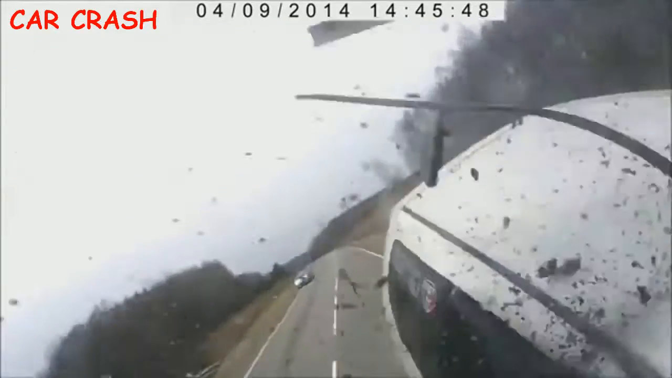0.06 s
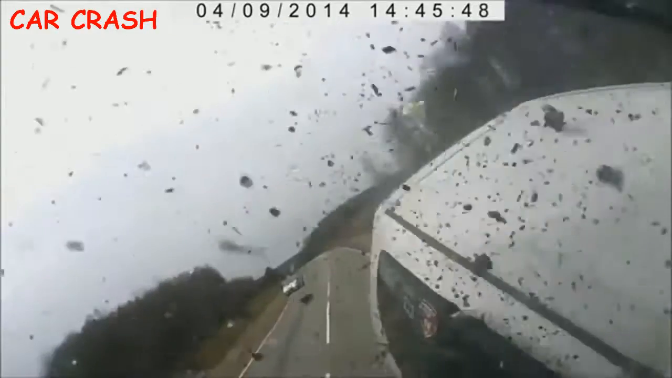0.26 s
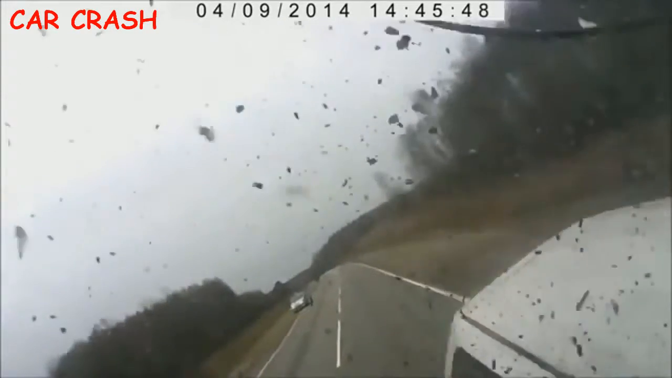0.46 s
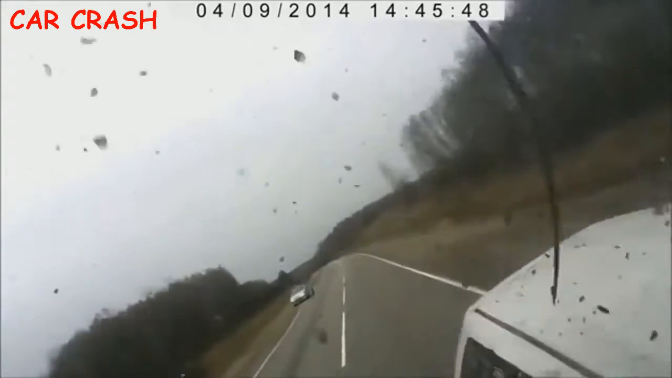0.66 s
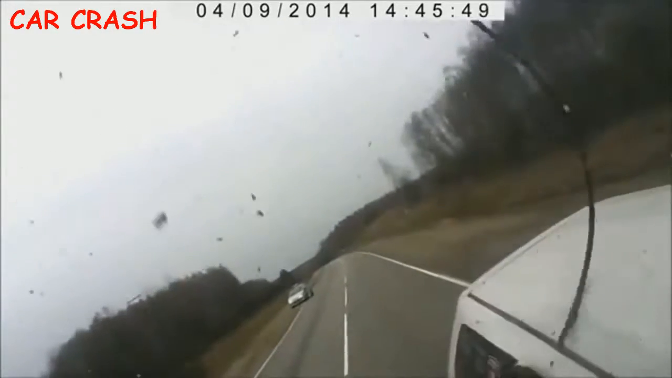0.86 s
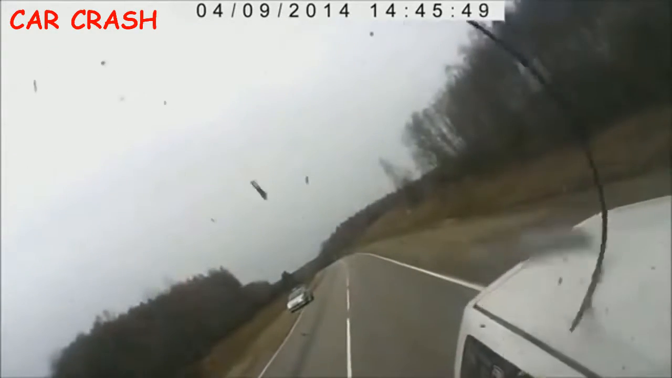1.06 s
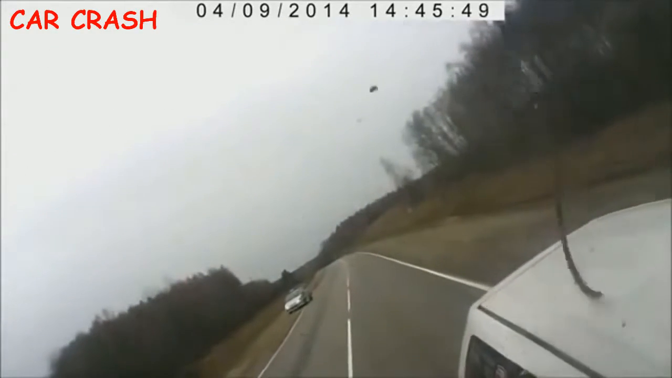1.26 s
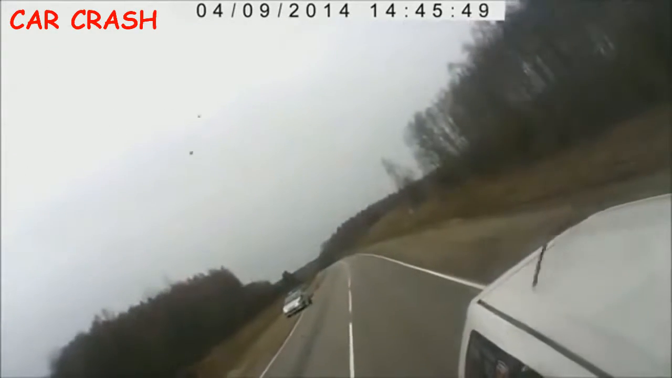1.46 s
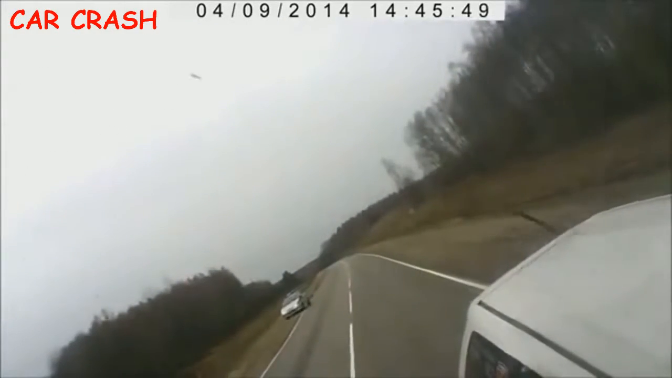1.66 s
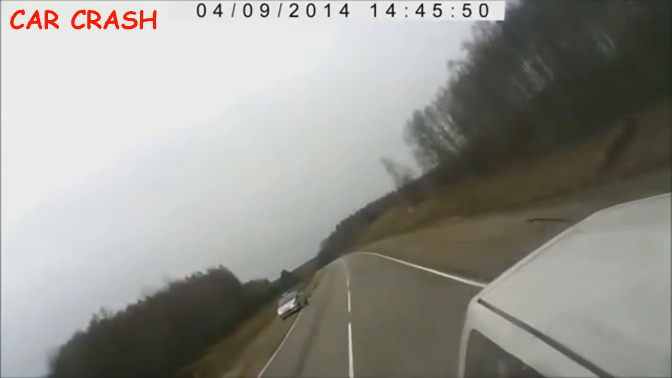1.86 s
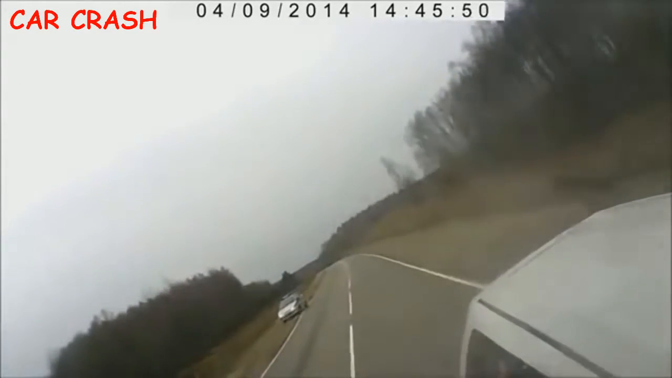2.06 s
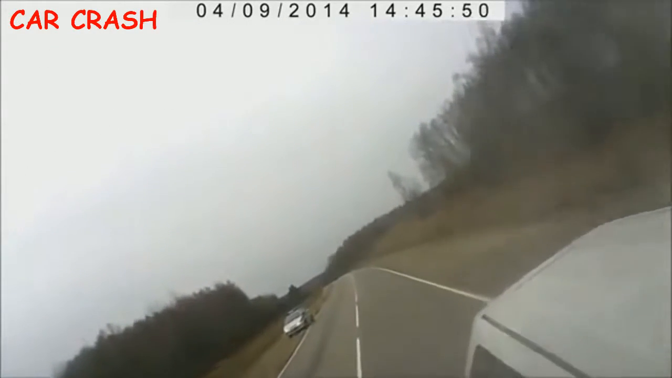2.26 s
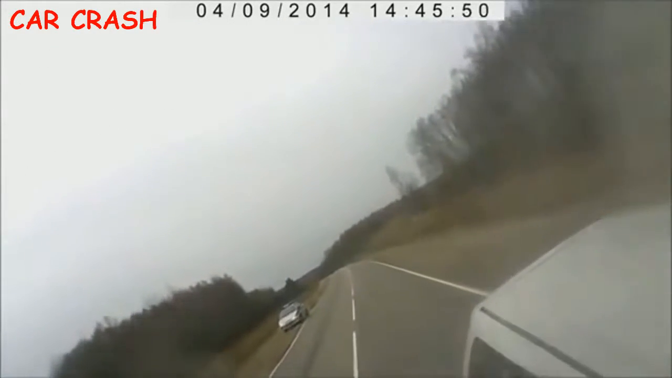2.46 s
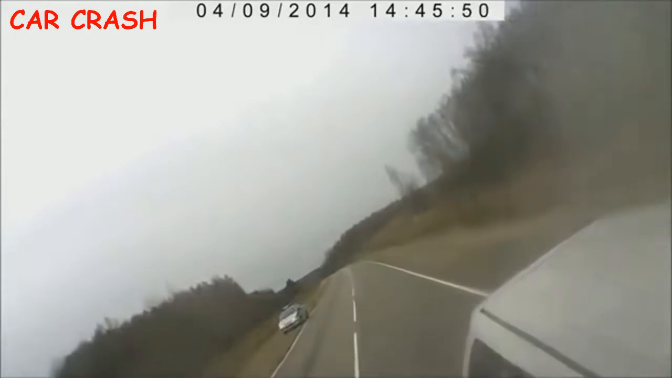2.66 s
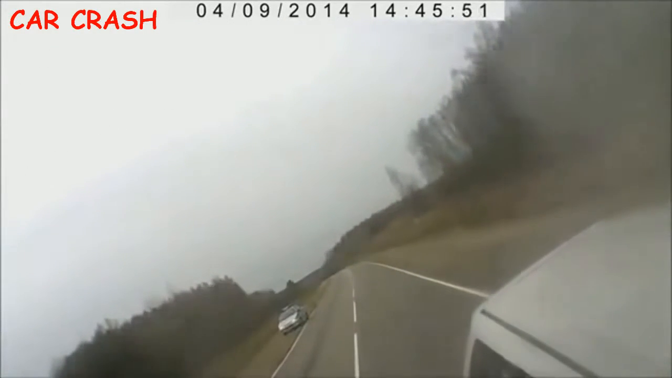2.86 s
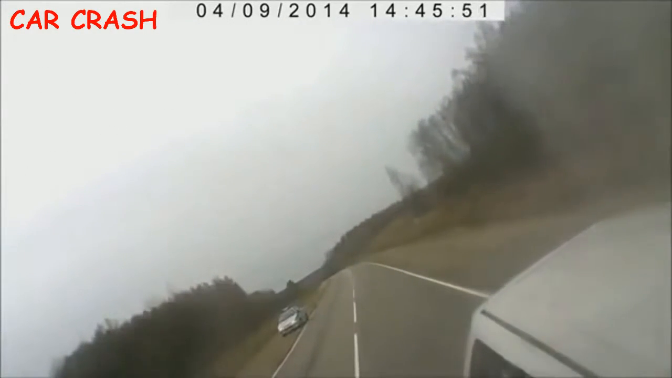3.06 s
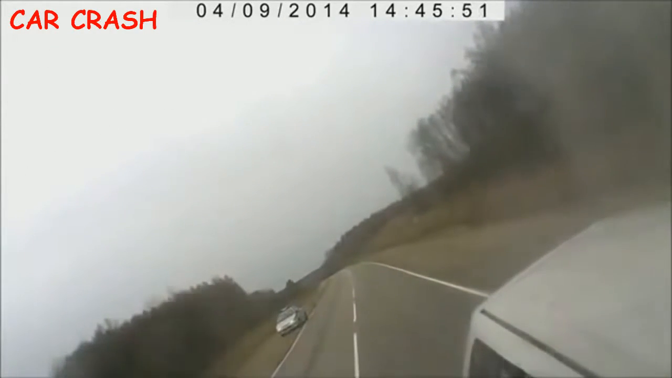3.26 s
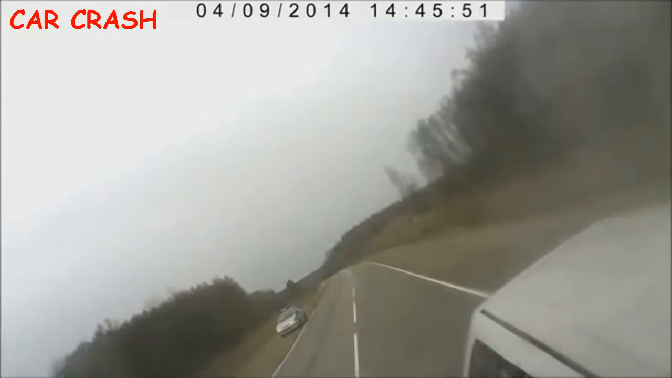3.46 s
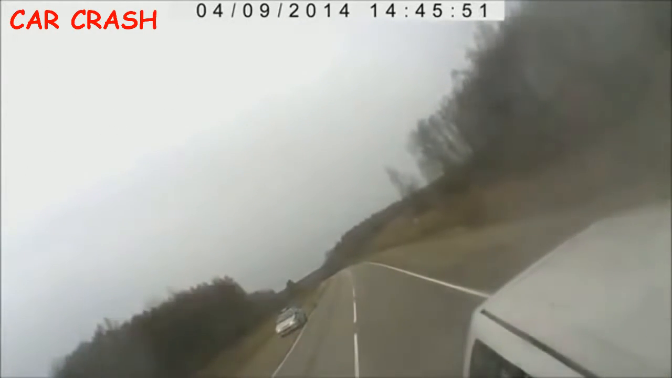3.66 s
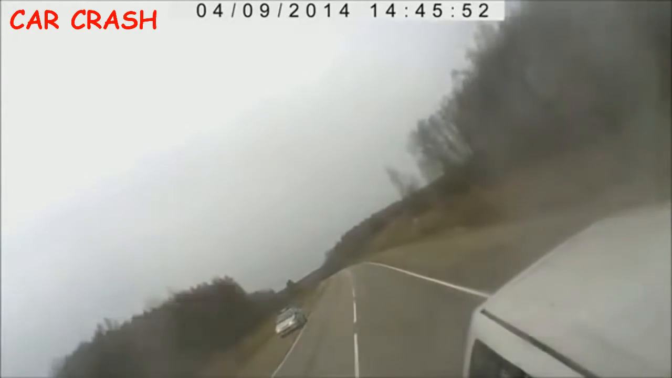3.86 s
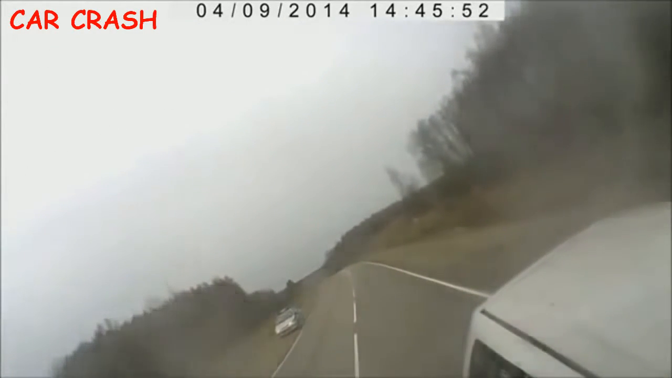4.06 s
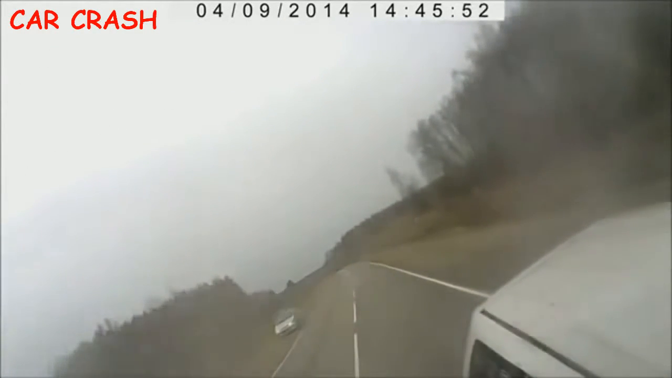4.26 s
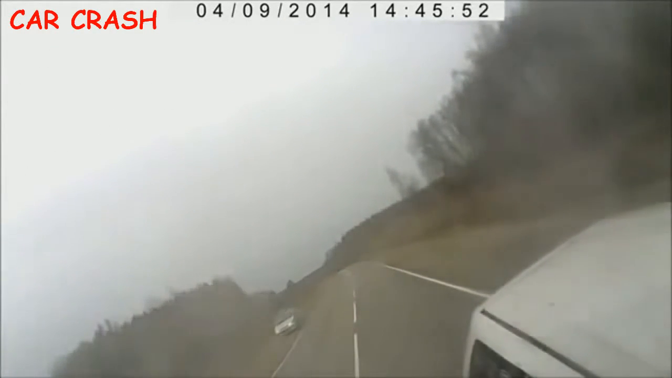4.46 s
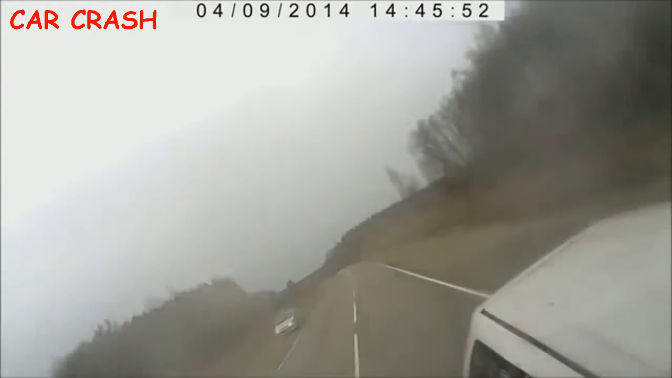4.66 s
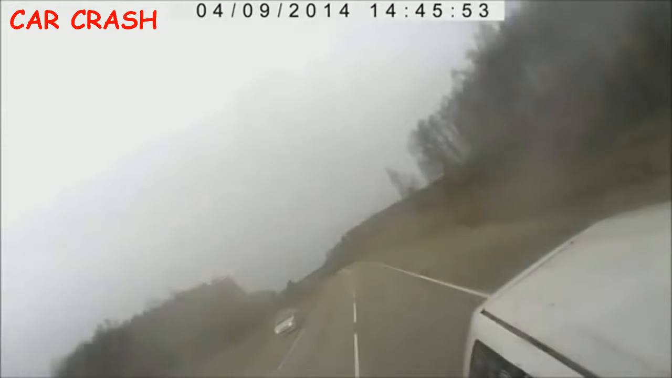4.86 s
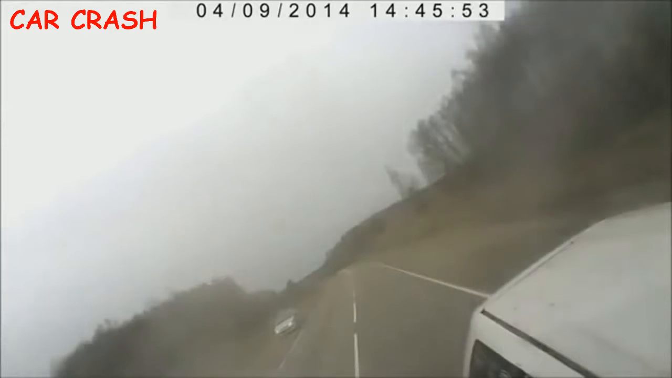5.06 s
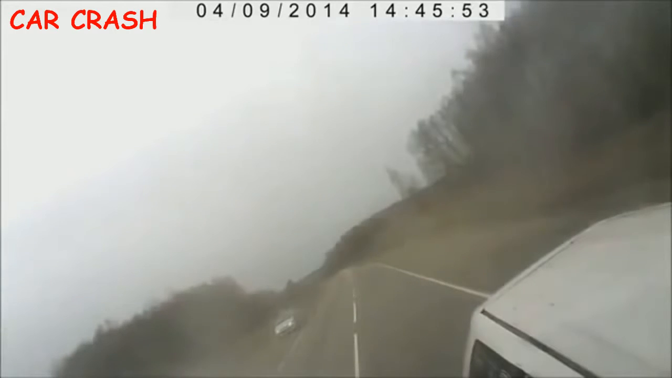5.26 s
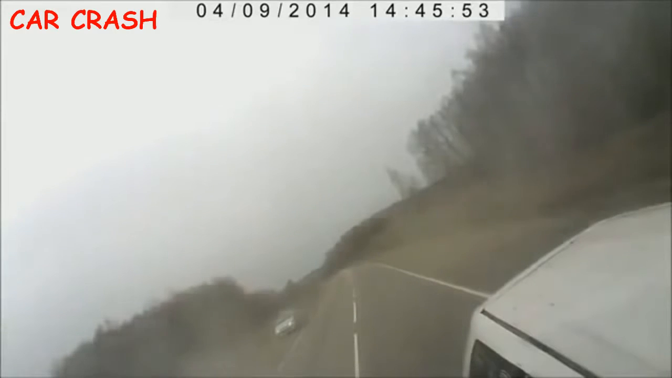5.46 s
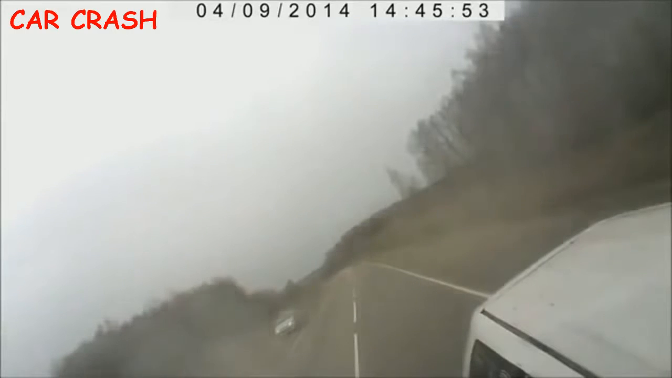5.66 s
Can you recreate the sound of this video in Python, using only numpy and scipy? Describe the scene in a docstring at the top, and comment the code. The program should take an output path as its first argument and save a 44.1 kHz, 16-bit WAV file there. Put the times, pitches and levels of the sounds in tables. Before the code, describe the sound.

A loud car crash starts immediately, heard close and dry from inside the cabin. Sheet metal buckles in rapid crunching snaps, with a falling groan and deep body thumps. It peaks around 0.3 to 0.8 seconds, when glass sprays and pings and the overloaded microphone turns the sound choppy and distorted. From about 1 second the crash dies down into scraping, chattering parts. Between 1.2 and 2.2 seconds, debris lands on the car in irregular dull knocks over a low sliding rumble, faint metal moans and the engine's throb. At about 2.3 seconds a second, quieter wave of wreckage clatters by with tinkling glass, settling just after 3 seconds. A few last knocks come near 3.4 seconds. The engine then idles low and steady until the end, just short of 6 seconds, with faint glass ticks around 4.5 and 5.2 seconds.

```python
"""Road collision from inside a car

Sheet metal buckles and groans, the body shudders and glass sprays. Debris knocks on the car, a second
wave of wreckage clatters by, and the engine is left idling. Blows excite the modes of panels and trim
in a small, damped cabin, and the pressure overloads the microphone of a dashboard camera."""
import sys
import numpy as np
from scipy import signal
from scipy.fft import rfft, irfft
from scipy.io import wavfile
from scipy.ndimage import uniform_filter1d

SR = 44100
rng = np.random.default_rng(int(sys.argv[2]) if len(sys.argv) > 2 else 0)


def file_out(sig):
    """Save sig as 16-bit WAV at sys.argv[1]."""
    # one column per channel
    cols = np.atleast_2d(sig).T
    # limit, then scale
    lim = np.clip(cols, -1, 1)
    pcm = np.round(lim * 32767).astype(np.int16)
    wavfile.write(sys.argv[1], SR, pcm)


N = 252428
TIME = np.arange(N) / SR

# spectrum radiated by glass and hard plastic: frequency_hz, level_db
GLASS_SPECTRUM = [(800, -16), (2000, 8), (3000, 4.5), (4100, 5.5), (5200, -1), (7200, -6.5), (8800, -7.5),
                  (11000, -7), (16000, -15)]


def undb(db):
    """Amplitude ratio of a level in decibels."""
    return 10 ** (np.asarray(db) / 20)


def unit(x):
    """Normalisation to rms 1."""
    return x / np.sqrt(np.mean(x ** 2) + 1e-18)


def past(start_s):
    """Seconds elapsed since an onset, zero before it."""
    return np.maximum(TIME - start_s, 0)


def add(out, start_s, x):
    """Superposition of x on out from start_s."""
    i = max(int(start_s * SR), 0)
    out[i:i + len(x)] += x[:N - i]


def wander(rate_hz):
    """Smooth random modulation with a spread near 1."""
    knots = rng.standard_normal(4096)
    joined = np.interp(TIME * rate_hz, np.arange(len(knots)), knots)
    return uniform_filter1d(joined, int(SR / rate_hz / 2) + 1)


def clicks(per_s, spread_db):
    """Shot noise: randomly timed impulses of uneven size, rms 1."""
    size = undb(spread_db * np.minimum(rng.exponential(size=N), 4))
    return unit((rng.random(N) < per_s / SR) * size * rng.choice([-1, 1], N))


def colour(x, spectrum, size=4096):
    """Minimum-phase filter through (frequency_hz, level_db) points; white noise keeps its power."""
    hz, db = np.transpose(spectrum)
    bins_hz = np.maximum(np.fft.rfftfreq(size, 1 / SR), 1)
    gain = undb(np.interp(np.log(bins_hz), np.log(hz), db))
    cepstrum = irfft(np.log(gain))
    cepstrum[1:size // 2] *= 2
    cepstrum[size // 2 + 1:] = 0
    response = irfft(np.exp(rfft(cepstrum)))
    return signal.fftconvolve(x, response / np.linalg.norm(response))[:len(x)]


def fade(t60_s):
    """Exponential decay down to -60 dB."""
    t = TIME[:int(max(t60_s, .002) * SR)]
    return undb(-60 * t / t[-1])


def burst(length_s):
    """Envelope of one contact: a fast rise, a short hold and a quick fall."""
    u = TIME[:SR // 4] / max(length_s, .004)
    return np.minimum(u / .08, 1) * np.exp(-(1.9 * u) ** 1.4)


def gate(noise, start_s, envelope):
    """Amplitude modulation: the stretch of noise from start_s, shaped by an envelope."""
    return envelope * noise[int(start_s * SR):][:len(envelope)]


def ring(hz, t60_s):
    """Free decay of one struck mode; the contact lasts about a cycle."""
    decay = fade(t60_s)
    cycles = hz * TIME[:len(decay)]
    return decay * np.sin(2 * np.pi * cycles) * (1 - np.exp(-2 * cycles))


def resonate(force, modes):
    """Forced response of (pitch_hz, bandwidth_hz, level_db) modes."""
    return sum(undb(db) * signal.lfilter(*signal.iirpeak(hz, hz / width_hz, fs=SR), force)
               for hz, width_hz, db in modes)


def buckling():
    """Sheet metal buckles in bursts of snaps. Returns the folds' ring and forces on metal and glass."""
    # heaviest buckles: start_s, level_db, splinter_db, pitch_hz
    heavy_buckles = [(.002, -3, -15, 810), (.015, -10, -16, 610), (.026, -1, -11.5, 525),
                     (.044, -4, -8, 710), (0.064, 5, -9.5, 470), (0.082, -2, -16, 900),
                     (0.097, -7, -16, 806), (.11, -2.5, -14, 576), (.142, -6, -18.5, 940),
                     (.186, -1, -17.5, 700), (.212, 0.5, -14.5, 708), (.234, -1.5, -12.5, 520),
                     (.254, -4, -12.5, 740), (.27, -1, -12, 635), (.277, 0, -17.5, 890),
                     (0.287, 0.5, -19, 850), (.31, -20, -20.5, 610), (0.319, 0, -13.5, 1170),
                     (.332, -3.5, -11.5, 1000), (.342, -1, -13.5, 800), (0.355, -0.5, -12, 1060),
                     (0.37, 0, -13, 788), (.381, -1.5, -8, 899), (.399, -2, -10, 789),
                     (.412, -2.5, -14.5, 780), (.429, -11, -9, 900), (0.435, 6.5, 0, 1230),
                     (.452, -4.5, -9.5, 816), (0.469, -3.5, -16.5, 1114), (.484, -4.5, -13, 895),
                     (0.496, 1, -12.5, 520), (.518, 3.5, -5, 718), (.537, -2.5, -17, 1010),
                     (.585, -4.5, -14.5, 490), (0.601, -5.5, -11.5, 490), (0.635, -12, -12.5, 1100),
                     (0.664, -7, -12, 850), (.692, -4, -6.5, 490), (.709, -7.5, -11.5, 657),
                     (.722, -5, -5.5, 1400), (0.75, -7.5, -12, 738), (0.759, -9, -2.5, 700),
                     (.786, -10, -22, 1010), (.815, -44, -55, 600), (0.838, -10, -31, 457),
                     (0.867, -8, -16, 519), (0.941, -6.5, -24, 876), (0.967, -15, -19.5, 1060),
                     (1.019, -27, -33, 700), (1.049, -16, -33, 571), (1.122, -20, -27, 433)]
    # spells of lesser buckles: start_s, end_s, level_db, splinter_db
    spells = [(0.203, 0.277, -10.5, -15), (0.345, 0.552, -14.5, -15), (0.59, .88, -9, -19)]
    buckles_per_s, spread_db = 60, 3
    folds, metal, glass = np.zeros((3, N))
    buckles = []
    for s, db, splinter_db, hz in heavy_buckles:
        add(folds, s, undb(db - 5) * ring(hz, t60_s=11 / hz))
        buckles.append((s, db, splinter_db))
    for start_s, end_s, db, splinter_db in spells:
        for k, (delay, softer, duller) in enumerate(rng.standard_normal((40, 3))):
            s = start_s + (k + .6 * abs(delay)) / buckles_per_s
            if s < end_s:
                buckles.append((s, db - spread_db * softer, splinter_db - spread_db * duller))
    snaps = clicks(per_s=7000, spread_db=5.5)
    crush, tear = burst(length_s=.0092), burst(length_s=.0058)
    for (s, db, splinter_db), pitches in zip(buckles, rng.random((200, 4))):
        add(metal, s, undb(db) * crush)
        add(glass, s, undb(splinter_db) * splinter(gate(snaps, s, tear), pitches))
        add(folds, s, undb(splinter_db) * crack(pitches[0]))
    return folds, snaps * metal, glass


def splinter(force, pitches, low_hz=2000, high_hz=10000, q=18):
    """Resonance of a brittle piece at its own few pitches, each 0-1 across the range."""
    modes = [(hz, hz / q, 4) for hz in low_hz * (high_hz / low_hz) ** pitches]
    return (force + resonate(force, modes)) / np.sqrt(3)


def crack(pitch, low_hz=2200, high_hz=5000):
    """Brittle fracture excites one heavily damped mode; pitch is 0-1 across the range."""
    return undb(4) * ring(low_hz * (high_hz / low_hz) ** pitch, t60_s=.009)


def panels(force):
    """Plate vibration: a broad, dull clank with the panel modes standing out of it."""
    # body panel modes: pitch_hz, bandwidth_hz, level_db
    panel_modes = [(266, 75, -1.5), (456.6, 20, -7), (557, 8, 1), (662, 16, 1.5), (780, 32, -8.5),
                   (1032, 63, 0.5), (1200, 88, -4), (1363, 5.8, -3.5)]
    # spectrum radiated by sheet metal: frequency_hz, level_db
    metal_spectrum = [(60, -25), (160, -6), (300, 1.5), (500, 3), (750, 3.5), (1100, 1.5), (1600, -4),
                      (2400, -17), (4000, -24.5), (8000, -43.5), (16000, -32.5)]
    return colour(force + undb(-3) * resonate(force, panel_modes), metal_spectrum)


def glass_and_trim(force):
    """Stiff glass and hard plastic answer a blow with a bright tick and high resonances."""
    # windscreen and trim modes: pitch_hz, bandwidth_hz, level_db
    trim_modes = [(2060, 39, 5.5), (2570, 6.8, -2), (2750, 83, -6.5), (3700, 150, 3), (3865, 35, 7.5),
                  (3970, 11, -5), (4670, 35, -21.5), (8850, 180, 10)]
    return colour(force + undb(-8) * resonate(force, trim_modes), GLASS_SPECTRUM)


def shudder():
    """Structure-borne jolts, hard in the collision and gentler in the slide, with damped thumps."""
    # spectrum of the body's vibration: frequency_hz, level_db
    body_spectrum = [(12, -13.5), (28, 3), (45, -3), (72, -8), (100, -5), (140, -5.5), (220, -9.5),
                     (350, -8.5), (800, -30), (3000, -74.5)]
    # blows that heave the body and press on the cabin air: start_s, level_db, push_s
    thumps = [(0.028, -9, 0.0073), (0.096, -1, 0.019), (0.17, -11, 0.0082), (0.291, 2, 0.015),
              (0.337, 9, 0.0043), (0.376, -0.5, 0.007), (0.439, 4.5, .008), (0.461, 2, 0.0063),
              (0.557, 0, 0.011), (0.723, 2.5, 0.0051), (0.806, -4, 0.0058), (0.83, 1.5, 0.0034)]
    fall_db_per_s, damping = 23, 1.38
    collision = undb(-10.5 - fall_db_per_s * past(.46))
    jolts = unit(colour(clicks(per_s=900, spread_db=-.1), body_spectrum))
    out = jolts * np.hypot(collision, slide())
    for s, db, push_s in thumps:
        u = TIME[:SR // 4] / push_s
        add(out, s, undb(db) * np.sin(np.pi * u) * np.exp(-damping * u))
    return out


def slide(fall_db_per_s=15):
    """Strength of sliding friction on the road: steady, then fading as the car comes to rest."""
    return undb(-32 - fall_db_per_s * past(2.36))


def groans(jitter=.11):
    """Stick-slip in bending metal: a rough harmonic moan that glides as the load changes."""
    # bodywork under load: start_s, end_s, from_hz, to_hz, level_db, step_db (per harmonic)
    bends = [(0.036, 0.26, 189.5, 52.14, -9, -9.5), (0.348, 0.413, 750, 783, -6, -29),
             (0.401, 0.464, 785, 726, -10, -27), (0.722, 0.75, 640, 696, -6, -16),
             (1.183, 1.527, 560, 254.2, -29.5, -7), (1.97, 2.184, 53.7, 73.5, -25, -4.5)]
    out, rough = np.zeros(N), wander(rate_hz=82)
    flutter = [undb(4 * wander(rate_hz=70)) for _ in range(4)]
    for start_s, end_s, from_hz, to_hz, db, step_db in bends:
        u = np.linspace(0, 1, int((end_s - start_s) * SR))
        span = int(start_s * SR) + np.arange(len(u))
        hz = from_hz * (to_hz / from_hz) ** u
        phase = 2 * np.pi * np.cumsum(hz * (1 + jitter * rough[span])) / SR
        moan = sum(undb(k * step_db) * gain[span] * np.sin((k + 1) * phase)
                   for k, gain in enumerate(flutter))
        add(out, start_s, undb(db) * moan * np.sin(np.pi * u))
    return out


def wreckage():
    """Many small impacts add in power. Returns shudder plus chimes, and forces on metal and glass."""
    # waves of debris: full_s, hold_s, rattle_db, grit_db, rise_db_per_s, fall_db_per_s
    waves = [(0.452, 0.27, -14.5, -26.5, 53, 27.5), (2.322, 0.033, -29.5, -42, 46, 30)]
    rest_s, grit_slope = 3.05, 1.075  # grit comes and goes a little faster than the rattle
    heavy, fine = slide() * undb(-11), np.zeros(N)  # the slide also scrapes the panels
    for full_s, hold_s, rattle_db, grit_db, rise, fall in waves:
        swell_db = -rise * np.maximum(full_s - TIME, 0) - fall * past(full_s + hold_s)
        heavy = np.hypot(heavy, undb(rattle_db + swell_db))
        fine = np.hypot(fine, undb(grit_db + grit_slope * swell_db))
    settle = undb(-152 * past(rest_s))  # heavy debris comes to rest
    trickle = undb(7 * past(rest_s))  # slows the decay of the grit
    clumps = undb(3.2 * wander(rate_hz=76))
    chimes = shards() * fine * undb(-6.5)
    rattle = clicks(per_s=1000, spread_db=1) * heavy * clumps
    grit = clicks(per_s=1500, spread_db=-.5) * fine * clumps
    return settle * (shudder() + chimes), settle * rattle, trickle * grit


def shards(low_hz=1874, high_hz=10150, spread_db=19, count=800):
    """Glass fragments chime at random times, each at its own natural frequency."""
    out = np.zeros(N)
    for when, pitch, life, size in rng.random((count, 4)):
        hz = low_hz * (high_hz / low_hz) ** pitch
        add(out, when * N / SR, undb(spread_db * size) * ring(hz, t60_s=.19 * (.21 + life)))
    return unit(colour(out, GLASS_SPECTRUM))


def tumbles():
    """Chattering contact drives a part's two modes. Returns their ring and forces on metal and glass."""
    # skidding parts: start_s, level_db, pitch_hz, splinter_db, length_s
    skids = [(0.481, -8.5, 912, -13, 0.096), (0.672, -11, 1056, -14.5, 0.12), (0.994, -25, 620, -28, 0.14),
             (1.04, -24.5, 567, -42, 0.23), (1.124, -22.5, 596, -52, 0.12), (1.224, -26, 443, -37, 0.13),
             (1.3, -24.5, 264, -33.5, 0.039), (2.378, -19, 656, -28.5, 0.052),
             (2.433, -21, 656, -32, 0.041), (2.47, -20, 490, -60, 0.11), (2.505, -26, 680, -35, 0.071),
             (2.54, -22.5, 663, -63, 0.22), (2.583, -15.5, 1060, -39, 0.036),
             (2.724, -23.5, 1090, -57, 0.053), (2.779, -19, 1120, -41, 0.051),
             (2.822, -18.5, 1590, -58, 0.059), (2.833, -24, 606, -38, 0.092),
             (2.91, -23.5, 990, -39, 0.062), (2.937, -36, 1280, -38, 0.055),
             (2.972, -29.5, 644, -61, 0.086), (3.006, -36.5, 462, -44, 0.084), (3.32, -28, 443, -47, 0.054),
             (3.341, -30, 1340, -52, 0.023), (3.442, -38, 468, -52, 0.041)]
    parts, metal, glass = np.zeros((3, N))
    snaps, grit = clicks(per_s=900, spread_db=-1), clicks(per_s=2200, spread_db=.5)
    overtone_ratios = rng.uniform(2.2, 2.23, len(skids))
    for (s, db, hz, splinter_db, length_s), ratio in zip(skids, overtone_ratios):
        contact = burst(length_s)
        chatter = gate(snaps, s, contact)
        for mode_hz, mode_db in [(hz, 0), (hz * ratio, -11)]:
            mode = signal.lfilter(*signal.iirpeak(mode_hz, Q=9, fs=SR), chatter)
            add(parts, s, undb(db + mode_db) * mode / np.abs(mode).max())
        add(metal, s, undb(db - 8) * chatter)
        add(glass, s, undb(splinter_db) * splinter(gate(grit, s, contact), rng.random(4)))
    # glancing contacts are soft, so the parts ring without a bright edge
    return signal.sosfilt(signal.butter(2, 3200, fs=SR, output="sos"), parts), metal, glass


def pings(split=.007, twin_db=-15):
    """Beating: a few parts ring clearly above the rest, each on a close pair of modes."""
    # loose metal and glass: start_s, pitch_hz, level_db, t60_s
    ringing_parts = [(.484, 3950, -12, 0.096), (0.498, 4416, -16, 0.1), (0.611, 4245, -21.5, 0.38),
                     (.785, 8580, -18, 0.06), (0.979, 4180, -28, 0.39), (1.068, 5200, -32, 0.23),
                     (1.075, 3255, -35, 0.52), (2.17, 3750, -47, 0.69), (2.17, 5300, -54, .5),
                     (2.302, 2203, -32.5, 0.63), (2.325, 8500, -37, 0.19), (2.355, 2172, -28.5, 0.4),
                     (2.946, 3810, -22, 0.035), (3.068, 4474, -47.5, 0.26), (3.069, 2680, -58, 0.82),
                     (3.068, 1970, -50, 0.32)]
    out = np.zeros(N)
    for s, hz, db, t60_s in ringing_parts:
        add(out, s, undb(db) * ring(hz, t60_s))
        add(out, s, undb(db + twin_db) * ring(hz * (1 + split), t60_s))
    return out


def knocks():
    """Impact excites a piece's damped modes. Returns snap and thock, and forces on metal and glass."""
    # pieces landing on the car: start_s, level_db, pitch_hz, tick_db
    landings = [(1.223, -7, 687, -40), (1.249, -12.5, 660, -42), (1.353, -13, 424, -48),
                (1.464, -7.5, 780, -32), (1.488, -9, 830, -57), (1.535, -12.5, 868, -54),
                (1.572, -11, 770, -36), (1.642, -16, 535, -60), (1.704, -10.5, 847, -38),
                (1.808, -12, 827, -59), (1.846, -12.5, 745, -65), (1.96, -10.5, 906, -31),
                (2.014, -15.5, 910, -41), (2.1, -16, 1053, -32), (2.163, -7, 854, -52),
                (2.199, -9.5, 777, -46), (2.3, -15.5, 828, -17.5), (2.329, -14.5, 820, -40),
                (2.385, -26, 640, -33), (2.441, -5.5, 720, -44), (2.51, -12, 753, -28.5),
                (2.519, -9.5, 1190, -41), (2.554, -37, 700, -30), (2.585, -21, 990, -29),
                (2.604, -10, 1310, -37.5), (2.651, -20, 684, -31.5), (2.783, -11, 1296, -38),
                (2.794, -19, 488, -30), (2.841, -22, 550, -33), (2.914, -15, 1020, -41),
                (2.977, -18.5, 660, -52), (3.337, -19.5, 1350, -52.5), (3.43, -14.5, 352, -56)]
    # modes of a piece: pitch_ratio, level_db, ring_share
    piece_modes = [(1, -2.5, 0.73), (1.22, -10.5, 0.6), (2.3, -15, 0.29)]
    ring_cycles = 36.8  # decay is counted in cycles, so big low pieces ring longer
    thocks, metal, glass = np.zeros((3, N))
    grain = rng.standard_normal(N)
    tick, snap = burst(length_s=.0057), fade(t60_s=.008)
    for (s, db, hz, tick_db), pitches in zip(landings, rng.random((len(landings), 4))):
        for ratio, mode_db, share in piece_modes:
            add(thocks, s, undb(db + mode_db) * ring(hz * ratio, share * ring_cycles / hz))
        add(thocks, s, undb(tick_db - 10) * gate(grain, s, snap))
        add(thocks, s, undb(tick_db) * crack(pitches[0]))
        add(metal, s, undb(db - 19) * burst(length_s=.018))
        add(glass, s, undb(tick_db) * splinter(gate(grain, s, tick), pitches))
    return thocks, metal * grain, glass


def crumbs(q=2.4):
    """Crumbs of glass tick on the trim, each a scratchy noise burst through a broad resonance."""
    # falling crumbs: start_s, peak_db, pitch_hz
    drops = [(1.917, -32, 2760), (2.052, -38, 5900), (2.153, -34, 8940), (4.527, -47.5, 3024),
             (5.124, -46.5, 4000), (5.282, -51.5, 3850)]
    out, contact = np.zeros(N), burst(length_s=.012)
    for (s, db, hz), grain in zip(drops, rng.standard_normal((len(drops), len(contact)))):
        mode = [(hz, hz / q, 0)]
        tick = resonate(resonate(contact * grain, mode), mode)
        add(out, s, undb(db) * tick / np.abs(tick).max())
    return out


def engine():
    """Nearly periodic firings make a harmonic throb; the cabin's rush pulses with them and flutters."""
    # course of the idle: time_s, firing_hz, level_db
    idle = [(1.2, 26.09, -28), (1.8, 25.43, -25), (2.4, 26.25, -44), (3.2, 27.55, -36), (3.8, 27.51, -39.5),
            (4.6, 27.48, -38), (5.7, 27.6, -37.5)]
    # harmonics of the firing rate: multiple, level_db
    harmonics = [(1, 2), (2, -9), (3, -21), (4, -18), (5, -21.5), (6, -21), (7, -35.5), (8, -20.5)]
    # spectrum of the cabin's rush: frequency_hz, level_db
    rush_spectrum = [(40, 1), (75, 4), (130, 2), (190, -4), (250, -4), (300, -4.5), (380, 0), (470, -1),
                     (600, -6.5), (800, -8), (920, -12), (1030, -4.5), (1300, -15), (1900, -21),
                     (2400, -30), (4000, -32), (7000, -41), (15000, -38)]
    times_s, firing_hz, level_db = np.transpose(idle)
    hz = np.interp(TIME, times_s, firing_hz) * (1 + .006 * wander(rate_hz=44))
    phase = 2 * np.pi * np.cumsum(hz) / SR
    uneven = undb(1.5 * wander(rate_hz=15))  # only the overtones waver in level
    throb = sum(undb(db) * (uneven if k > 1 else 1) * np.cos(k * phase) for k, db in harmonics)
    throb *= undb(np.interp(TIME, times_s, level_db))
    rush = unit(colour(rng.standard_normal(N), rush_spectrum)) * (1 + .121 * np.cos(phase))
    return throb + rush * undb(-44 + .9 * wander(rate_hz=18))


def cabin(x, t60_s=.043, wet_db=-15):
    """Reverberation in a small, well-damped space adds a short diffuse tail."""
    tail = gate(rng.standard_normal(N), 0, fade(t60_s))
    return x + undb(wet_db) * signal.fftconvolve(x, tail / np.linalg.norm(tail))[:N]


def scene():
    """Superposition: the blows drive the same panels and glass, over an engine that idles throughout."""
    direct, metal, glass = np.sum([buckling(), tumbles(), knocks(), wreckage()], axis=0)
    crash = direct + groans() + panels(metal) + glass_and_trim(glass) + crumbs() + pings()
    return (cabin(crash) + engine())[None]


def record(dry):
    """Overload: slow pressure stiffens the diaphragm, chopping gaps in the crash, and peaks flatten."""
    slow_hz, choke_level, leak, ceiling = 140, .58, .1, .72
    push = signal.sosfiltfilt(signal.butter(2, slow_hz, fs=SR, output="sos"), dry)
    passed = leak + (1 - leak) / (1 + (push / choke_level) ** 4)
    choked = ceiling * np.tanh(push / ceiling) + (dry - push) * passed
    limited = choked / (1 + (choked / ceiling) ** 8) ** (1 / 8)
    # the camera dulls the treble and cuts both ends of the spectrum
    dull = signal.sosfilt(signal.butter(1, 7000, fs=SR, output="sos"), limited)
    coupled = signal.sosfilt(signal.butter(1, 8, "high", fs=SR, output="sos"), dull)
    return signal.sosfilt(signal.ellip(10, .1, 80, 15800, fs=SR, output="sos"), coupled)


dry = scene()
out = record(dry)
file_out(out)
```